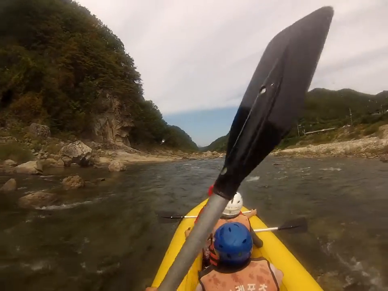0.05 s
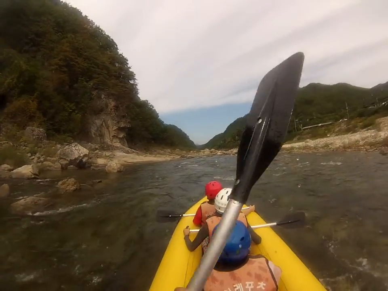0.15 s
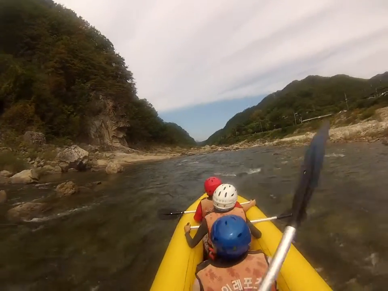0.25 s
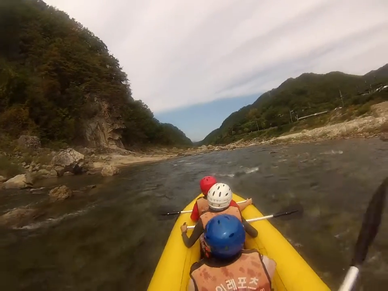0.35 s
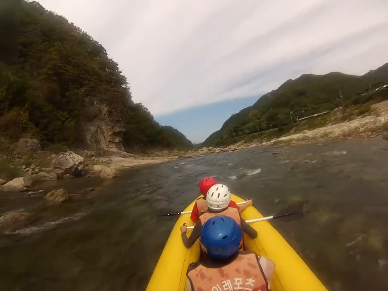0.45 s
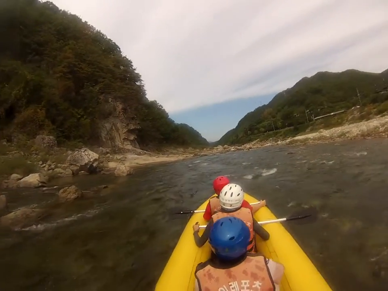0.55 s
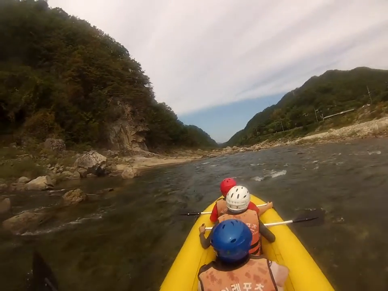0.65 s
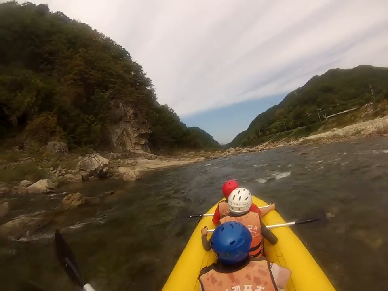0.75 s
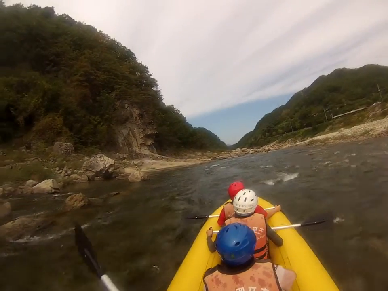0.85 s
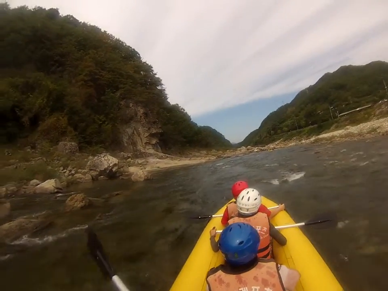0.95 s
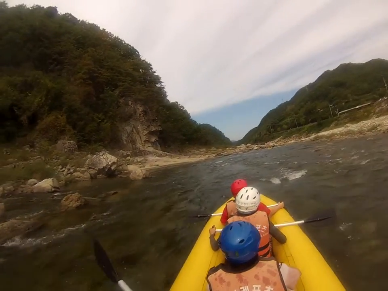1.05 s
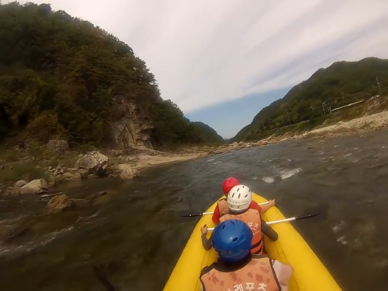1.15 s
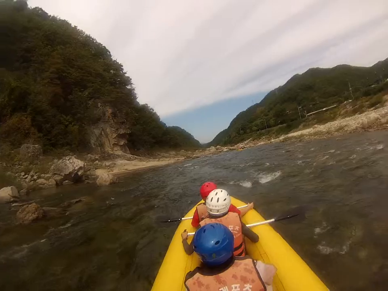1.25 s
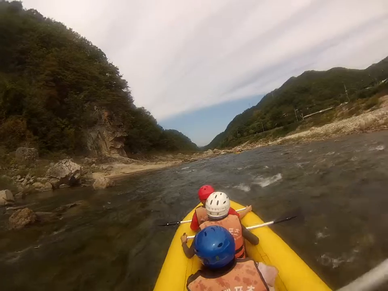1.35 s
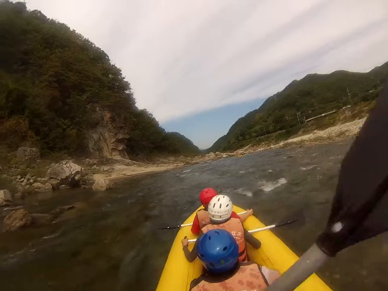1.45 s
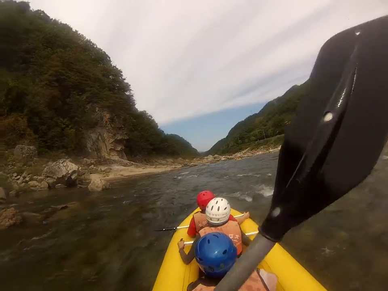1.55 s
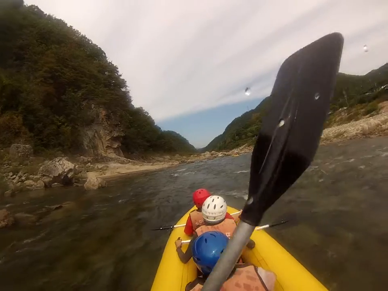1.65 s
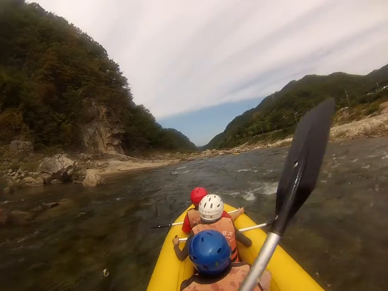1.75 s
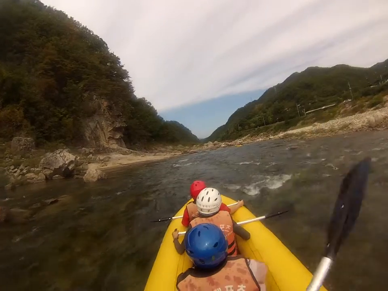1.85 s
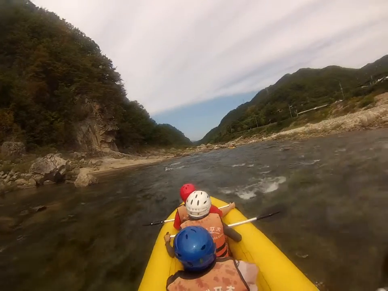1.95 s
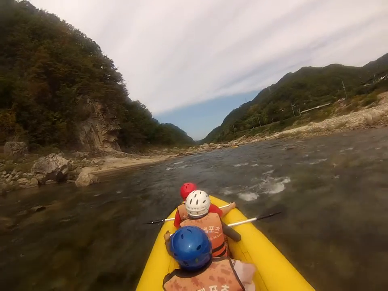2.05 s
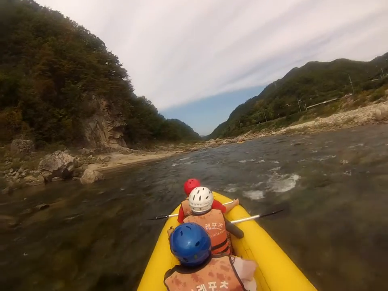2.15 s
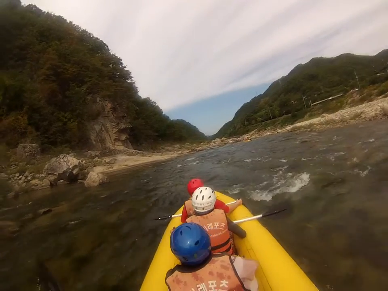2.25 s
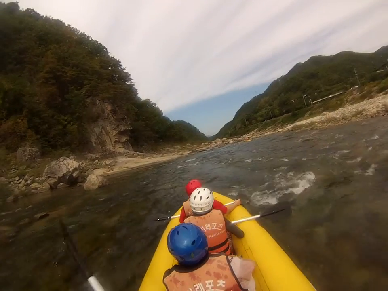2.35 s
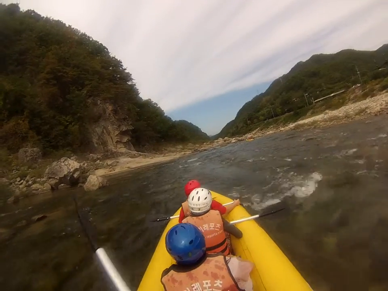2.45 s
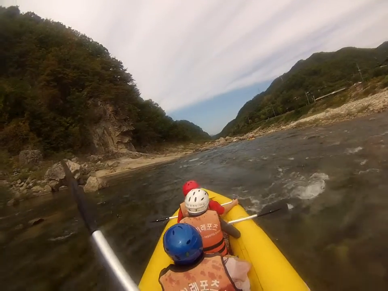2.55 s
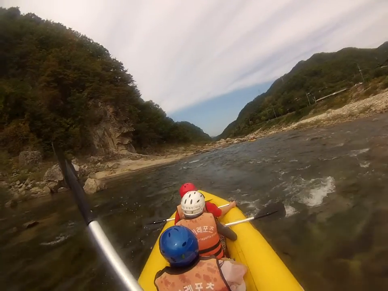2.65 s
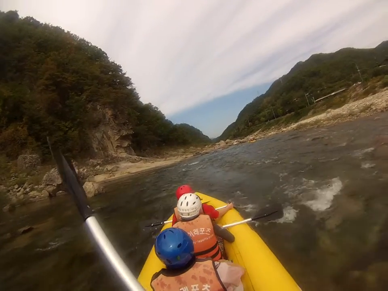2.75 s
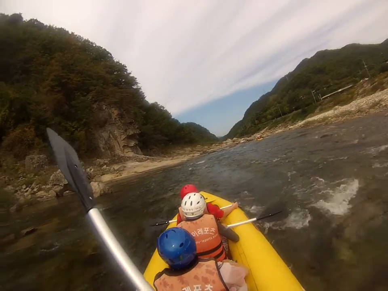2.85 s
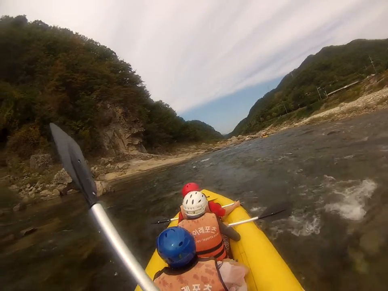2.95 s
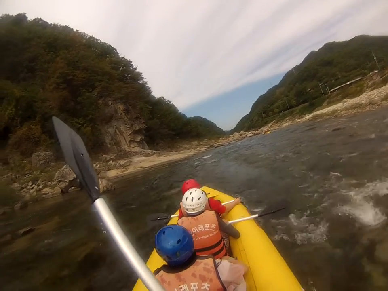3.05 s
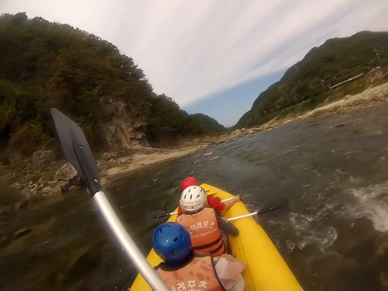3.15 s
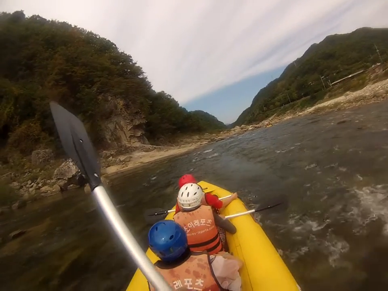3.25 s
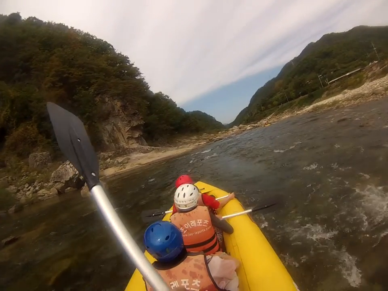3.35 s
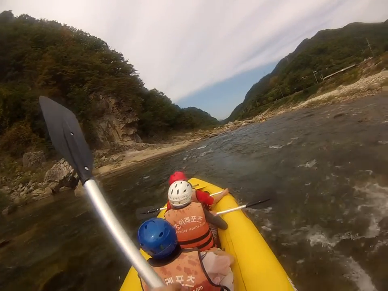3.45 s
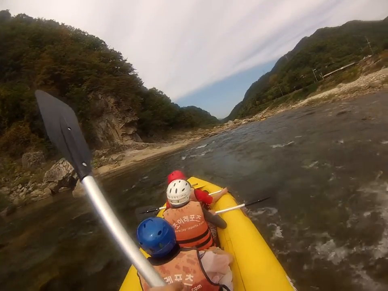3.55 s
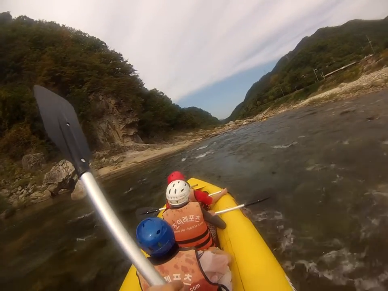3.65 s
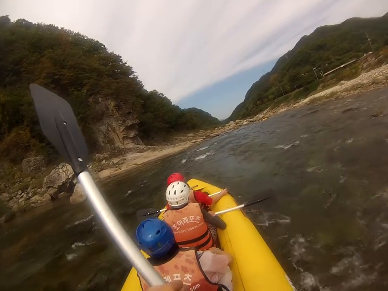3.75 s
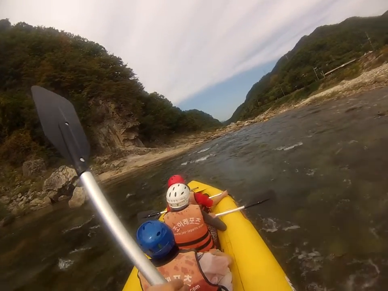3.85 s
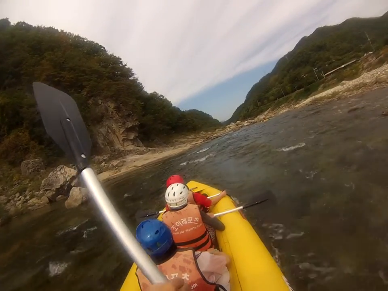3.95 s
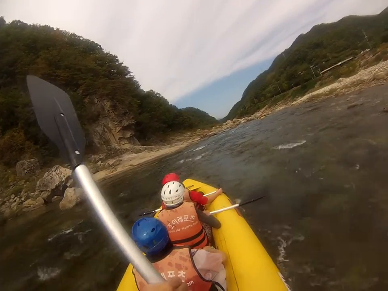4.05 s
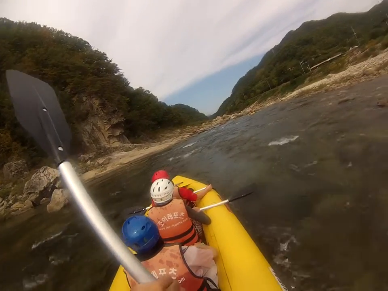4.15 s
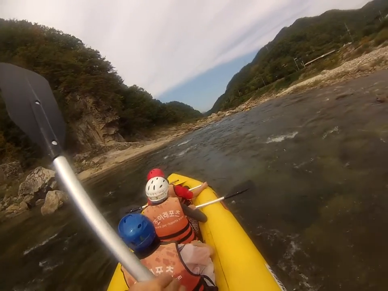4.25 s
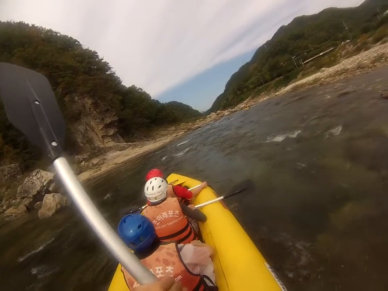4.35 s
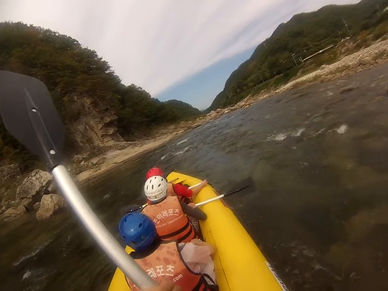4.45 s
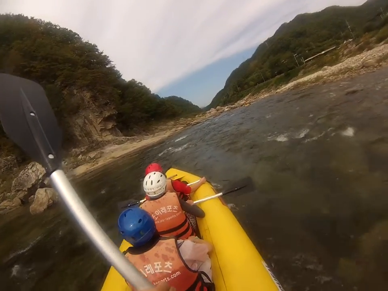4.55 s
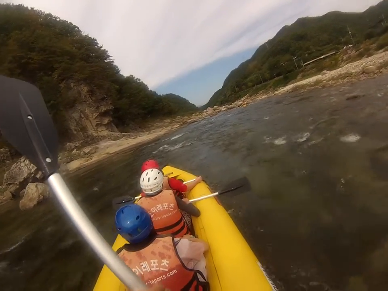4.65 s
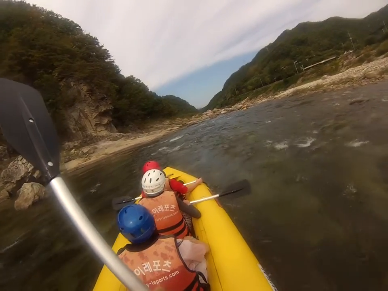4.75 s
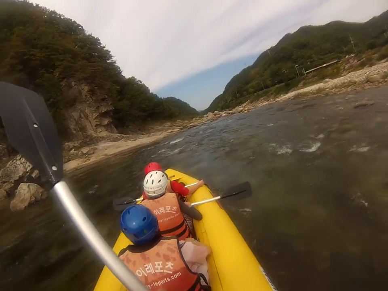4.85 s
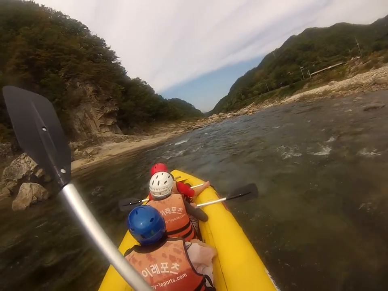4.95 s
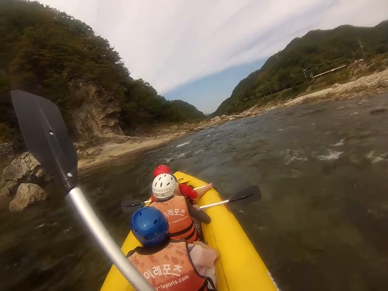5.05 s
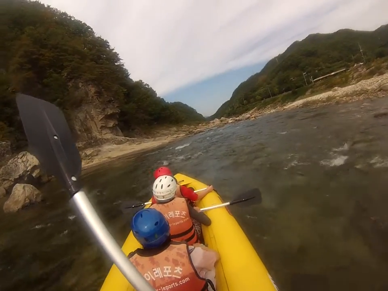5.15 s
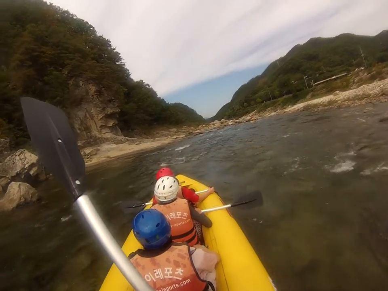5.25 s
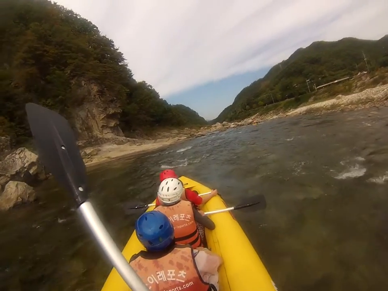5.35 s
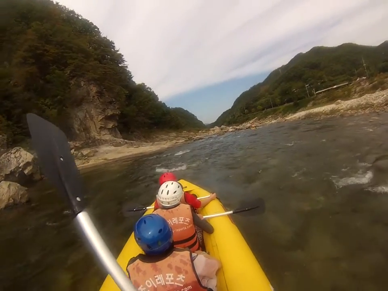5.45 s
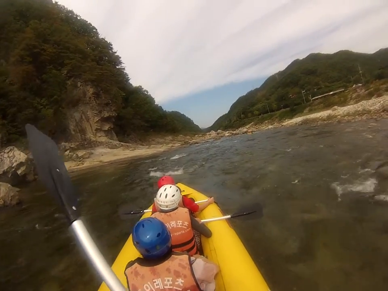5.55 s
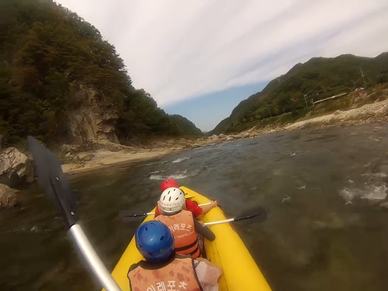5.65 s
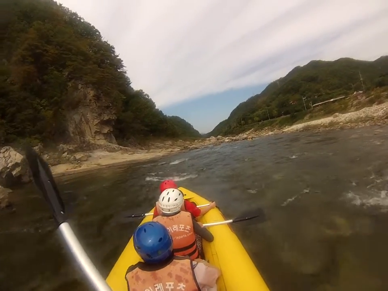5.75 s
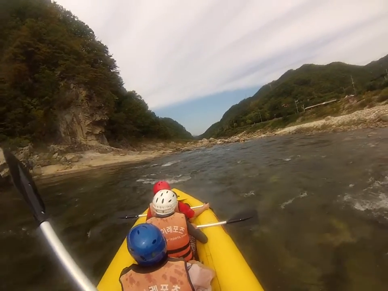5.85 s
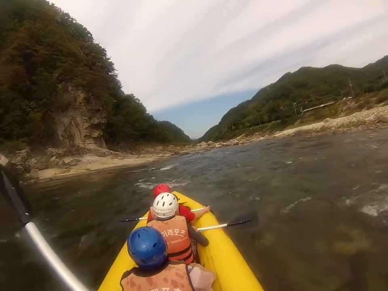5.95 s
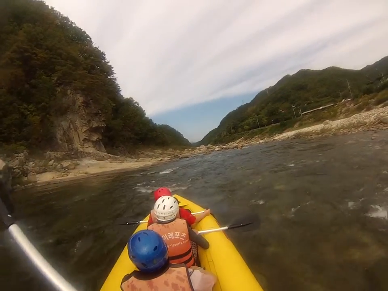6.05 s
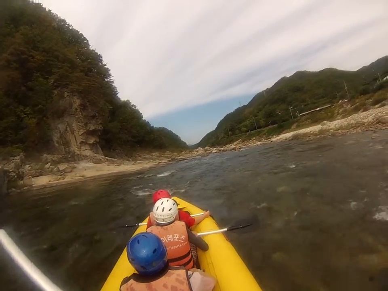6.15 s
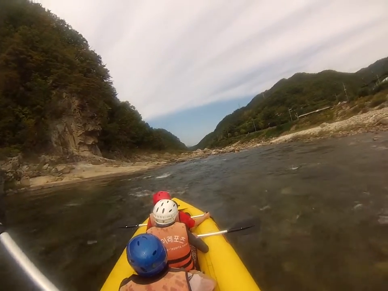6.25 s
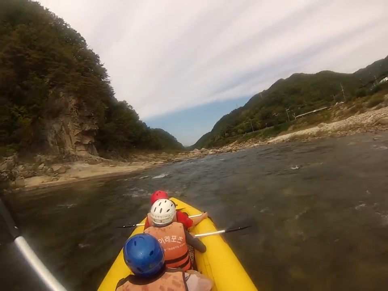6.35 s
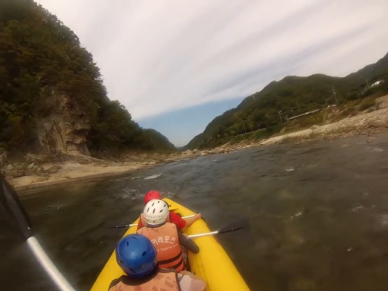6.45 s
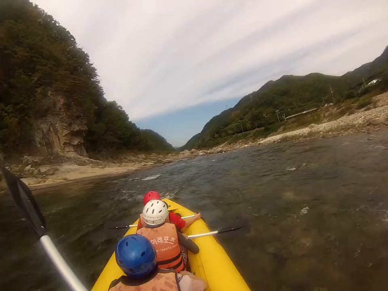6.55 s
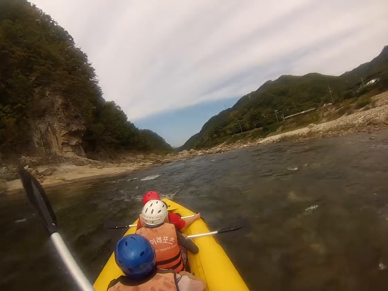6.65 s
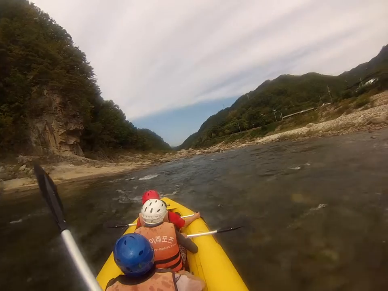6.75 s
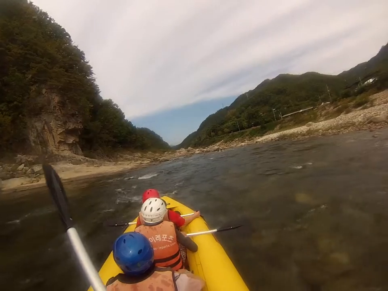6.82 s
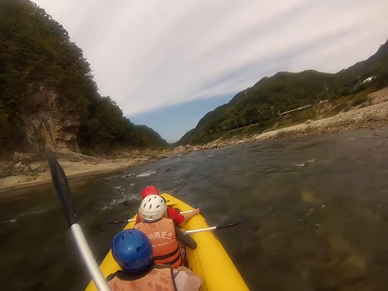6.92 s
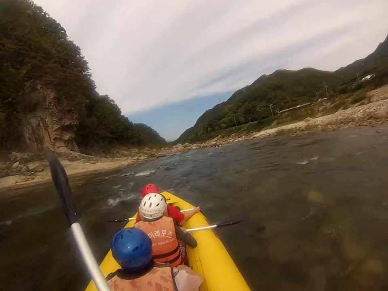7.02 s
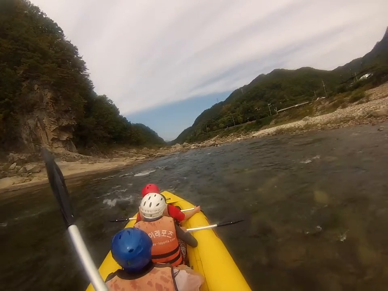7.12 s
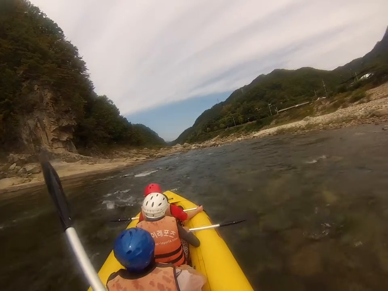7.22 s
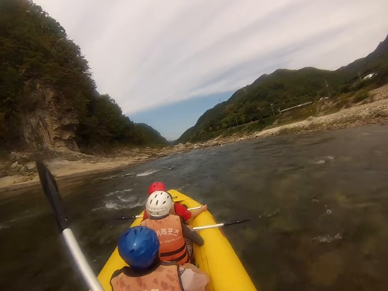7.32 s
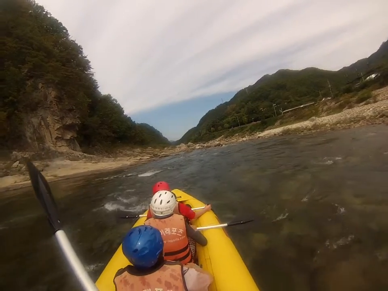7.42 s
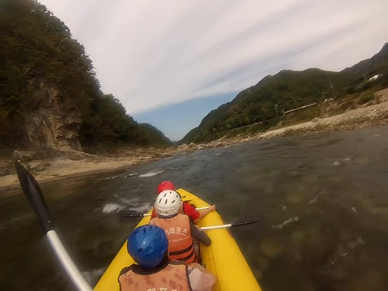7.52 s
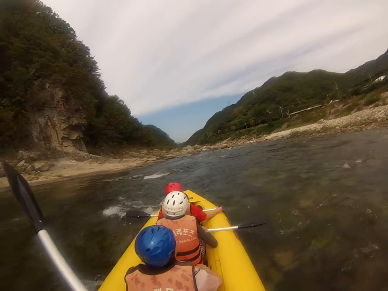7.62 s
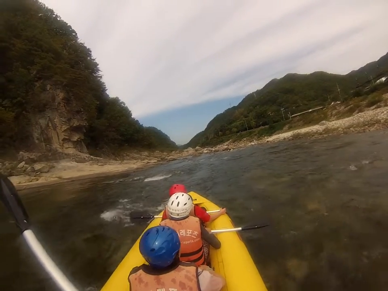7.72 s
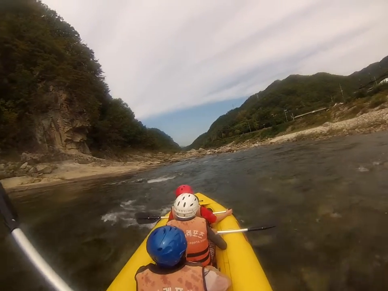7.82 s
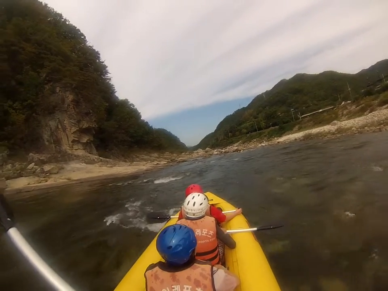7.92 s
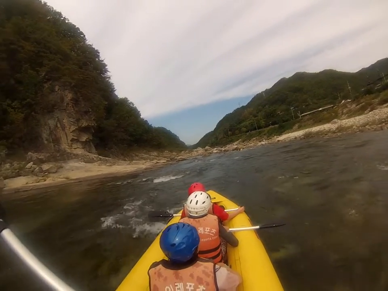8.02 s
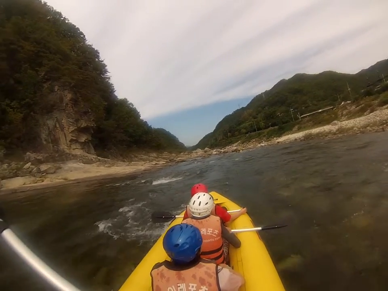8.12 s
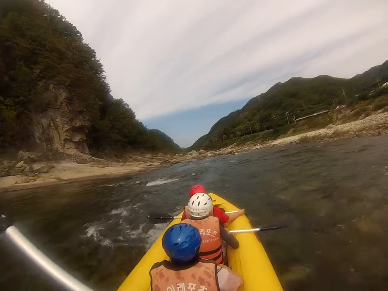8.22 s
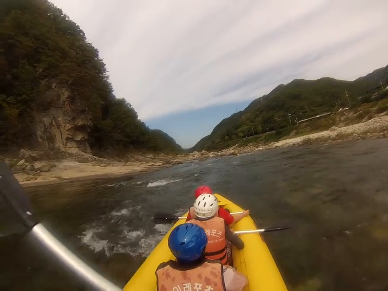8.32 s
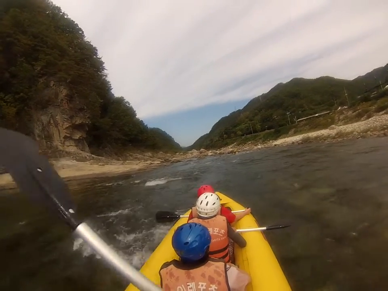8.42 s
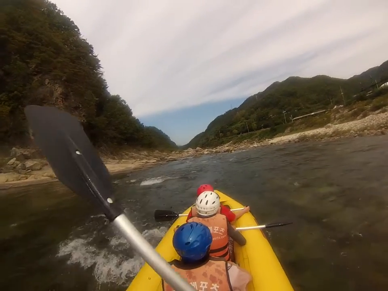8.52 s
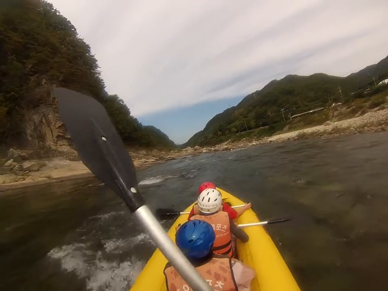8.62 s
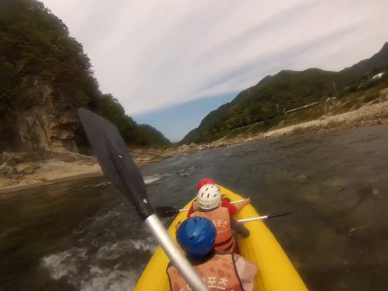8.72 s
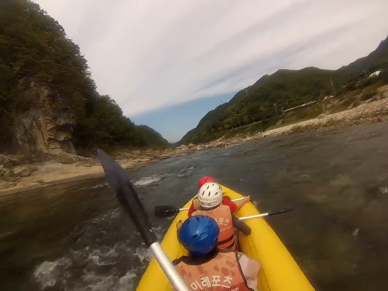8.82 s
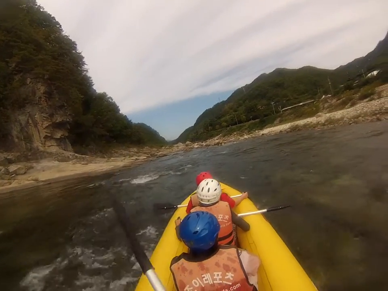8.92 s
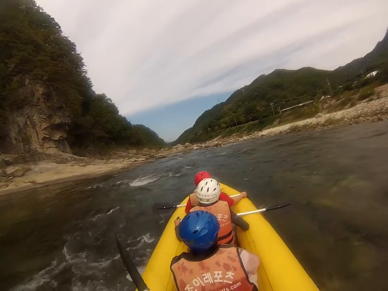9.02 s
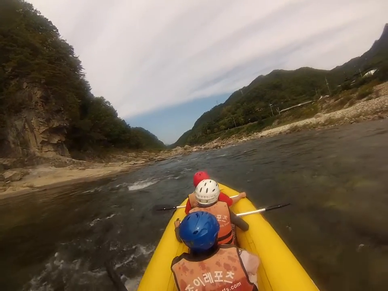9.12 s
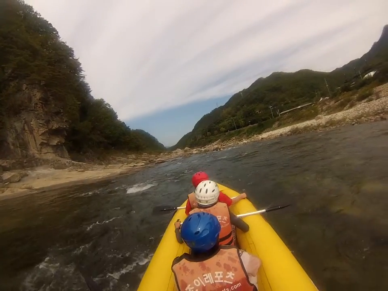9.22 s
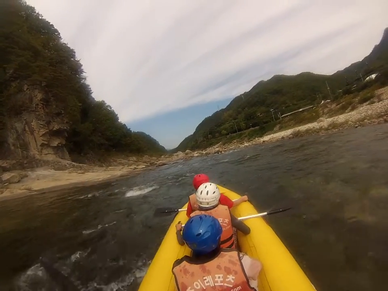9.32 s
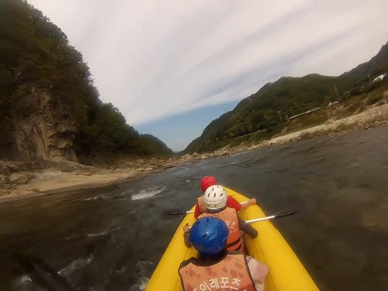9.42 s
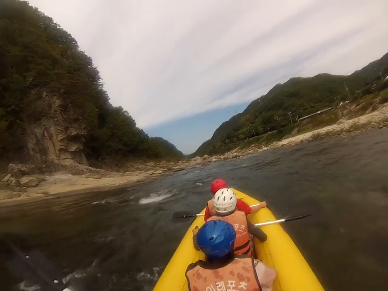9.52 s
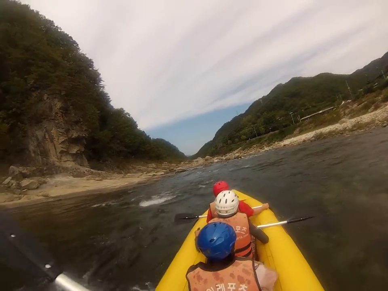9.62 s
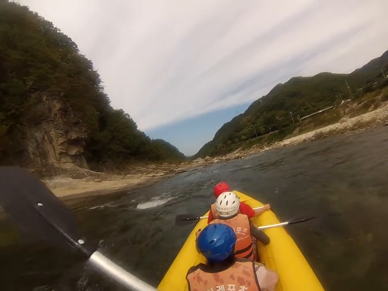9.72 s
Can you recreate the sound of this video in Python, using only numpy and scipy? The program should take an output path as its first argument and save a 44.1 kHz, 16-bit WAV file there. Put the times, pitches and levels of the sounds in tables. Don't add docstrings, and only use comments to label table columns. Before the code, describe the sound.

Shallow rapids rush and fizz around an inflatable boat, with bubbly plops, small splashes and a deep hull knock, heard through a sealed case.

```python
import sys
import numpy as np
from scipy import signal
from scipy.fft import rfft, irfft, next_fast_len
from scipy.io import wavfile
from scipy.ndimage import uniform_filter1d

SR = 44100
rng = np.random.default_rng(int(sys.argv[2]) if len(sys.argv) > 2 else 0)


def unload_audio(sound):
    columns = np.transpose(np.atleast_2d(sound))
    steps = np.round(np.clip(columns, -1, 1) * 32767)
    wavfile.write(sys.argv[1], SR, steps.astype(np.int16))


def boost_factor(decibels):
    exponent = np.asarray(decibels, float) / 20
    return 10 ** exponent


N = 431298
CONTROL_STEP = 40

# (frequency [Hz], level [dB per Hz])
WATER_TONE = [(100, -5.5), (300, -0.5), (700, -3.5), (1200, -2.5), (2000, -1.5), (3200, -11), (4500, -15.5),
              (7000, -20.5), (11000, -21.5), (16000, -33)]


def in_time(rows):
    s, *columns = np.transpose(rows)
    now = np.arange(0, N, CONTROL_STEP) / SR
    return [np.interp(now, s, column) for column in columns]


def gain_in_time(db):
    return np.interp(np.arange(N) / CONTROL_STEP, np.arange(len(db)), boost_factor(db))


def crest(s, length):
    age = (np.arange(0, N, CONTROL_STEP) / SR - s) / length
    return np.cos(np.pi * np.clip(age, -0.5, 0.5)) ** 2


def at_hz(points, hz):
    points = np.array(points)
    return np.interp(np.log(hz), np.log(points[:, 0]), points[:, 1])


def rms_one(x):
    return x / np.sqrt(np.mean(x ** 2) + 1e-20)


def drift(rate_hz):
    r = np.exp(-2 * np.pi * CONTROL_STEP * rate_hz / SR)
    noise = rng.standard_normal(N // CONTROL_STEP + 2001)
    return rms_one(signal.lfilter([1], [1, -2 * r, r * r], noise)[2000:])


def coloured(spectrum):
    hz = np.maximum(np.fft.rfftfreq(N, 1 / SR), 1)
    return rms_one(irfft(rfft(rng.standard_normal(N)) * boost_factor(at_hz(spectrum, hz)), N))


def microphone_hiss():
    # (frequency [Hz], level [dB per Hz])
    hiss_tone = [(100, 7), (400, -2), (1000, -3.5), (3000, -10.5), (8000, -12), (12000, -19.5),
                 (16000, -20.5)]
    return boost_factor(-65) * coloured(hiss_tone)


def thumps():
    # (time [s], peak level [dB], start pitch [Hz], end pitch [Hz], length [s])
    knocks = [
        (0.456, -41.5, 204, 124, 0.076),
        (1.862, -30.5, 123, 52, 0.041),
        (1.86, -46.5, 246, 250, 0.026),
    ]
    swell = 0.31
    out = np.zeros(N)
    for s, db, start_hz, end_hz, length in knocks:
        age = np.arange(int(length * SR)) / SR / length
        pitch_hz = start_hz * (end_hz / start_hz) ** age
        phase = 2 * np.pi * np.cumsum(pitch_hz) / SR
        rise = np.sin(np.pi / 2 * np.minimum(age / swell, 1)) ** 2
        fall = np.clip((1 - age) / (1 - swell), 0, 1) ** 0.46
        start = int(s * SR)
        out[start:start + age.size] += boost_factor(db) * np.minimum(rise, fall) * np.sin(phase)
    return out


def buffet():
    # (frequency [Hz], level [dB per Hz])
    heave_tone = [(4, 2), (8, 9.5), (18, 9), (25, -4), (35, -7.5), (55, -24), (120, -48), (1000, -130)]
    # (frequency [Hz], level [dB per Hz])
    flutter_tone = [(18, -15), (30, 3.5), (70, 3.5), (100, -6.5), (140, -12.5), (220, -19), (400, -49),
                    (3000, -110)]
    # (time [s], level [dB])
    wind_push = [(0.0, -45), (.12, -34), (.6, -30.5), (.65, -47), (1.5, -43), (1.59, -32.5), (2.0, -34),
                 (2.7, -41), (3.2, -45.5), (4.1, -45), (4.9, -41.5), (5.3, -51), (6.5, -51.5), (7.6, -49.5),
                 (8.2, -45.5), (8.9, -36.5), (9.3, -46.5), (9.78, -52.5)]
    # (time of crest [s], heave lift [dB], flutter lift [dB], length [s])
    lurches = [(0.11, 3, 6.5, 0.36), (0.503, -1, 2, .2), (1.22, 10, 2, 0.25), (1.623, 7, -1, 0.13),
               (1.913, 6, -5, 0.15), (2.172, 4.5, 0, .1), (2.578, 8, -4, 0.11), (3.052, 8, 1, 0.15),
               (3.5, 6.5, 3.5, 0.82), (4.21, 6.5, -4, 0.1), (4.405, -4, 5, 0.18), (4.827, 6.5, -1.5, 0.18),
               (5.45, 8.5, -1.5, 0.46), (5.862, 8, -2, 0.38), (6.17, 13, -6, 0.26), (6.435, 16, -7, 0.13),
               (6.665, 11.5, -7, 0.26), (6.92, 9.5, -0.5, 0.28), (7.138, 6, -7, 0.22), (7.34, -7, 0, 0.18),
               (7.58, -13, -5, 0.17), (7.75, 3, 1, .3), (7.98, -20, 6, 0.11), (8.232, 6.5, -2, 0.22),
               (8.706, 4.5, 0, 0.18), (8.783, -11, 10, 0.067), (8.855, 10, 5, 0.13), (8.999, 13, 3, 0.13),
               (9.198, 13, 6, 0.08), (9.468, 8, 0, 0.35)]

    push_db, = in_time(wind_push)
    heave_db, flutter_lift_db = sum(np.outer([heave_lift, flutter_lift], crest(s, length))
                                    for s, heave_lift, flutter_lift, length in lurches)
    heave_db = push_db + heave_db
    flutter_db = -56 + 0.25 * (heave_db + 43) + flutter_lift_db
    heave = coloured(heave_tone)
    swell = uniform_filter1d(np.abs(signal.hilbert(heave, next_fast_len(N))[:N]), size=4000)
    heave = rms_one(heave / (swell + 0.47))
    flutter = gain_in_time(flutter_db + 0.73 * drift(7.9)) * coloured(flutter_tone)
    return gain_in_time(heave_db) * heave + flutter


def washes():
    # (time of crest [s], level [dB], pitch [Hz], length [s])
    passing = [
        (7.2, -71.5, 2720, 2.2),
        (8.58, -68, 2590, 2.8),
        (3.6, -69, 3350, 2.0),
        (3.7, -78, 5720, 2.8),
        (4.2, -78, 8600, 1.8),
        (9.48, -77, 7750, .6),
        (2.3, -76, 6600, 0.73),
        (8.6, -78, 5330, 0.96),
        (3.8, -78, 10400, 3),
    ]
    half_width = 0.07 / 2
    out = 0
    for s, db, hz, length in passing:
        edges_hz = [hz / (1 + half_width), hz * (1 + half_width)]
        sos = signal.butter(2, edges_hz, "band", fs=SR, output="sos")
        level_db = db + 10 * np.log10(crest(s, length) + 1e-6) + 2.0 * drift(18.0)
        out = out + gain_in_time(level_db) * rms_one(signal.sosfilt(sos, rng.standard_normal(N)))
    return out


def bubbles(s, db, hz, t60, rise, swell):
    t = np.arange(int(max(t60) * SR))[None] / SR
    s, db, hz, t60, rise = (np.reshape(v, (-1, 1)) for v in (s, db, hz, t60, rise))
    age = t / t60
    envelope = boost_factor(db - 60 * age) * np.minimum(age / swell, 1) ** 2
    rings = envelope * np.sin(2 * np.pi * hz * t * (1 + rise * (age - 0.25)))
    start_s = np.maximum(s - 0.599 * swell * t60, 0)
    at = (start_s * SR).astype(int) + np.arange(t.size)
    return np.bincount(at.ravel(), rings.ravel(), N + t.size)[:N]


def near_bubbles(events, cycles, rise):
    s, db, hz = np.transpose(events)
    return bubbles(s, db, hz, cycles / hz, np.full_like(s, rise), swell=0.24)


def near_drops():
    # (time [s], peak level [dB], pitch [Hz])
    plops = [(2.7152, -29.5, 2200), (2.9711, -40, 2250), (2.9941, -38, 2180), (3.0335, -38, 2180),
             (3.0779, -35, 2230), (3.3777, -36, 2270), (3.4057, -36, 2180), (3.5838, -44, 2120),
             (4.2138, -41, 2220), (4.3445, -34, 2260), (4.5605, -47, 2300), (5.15, -38, 2290),
             (5.589, -36, 2200), (7.1117, -44, 2260), (8.765, -38.5, 2260), (8.9496, -54, 2260)]
    # (time [s], peak level [dB], pitch [Hz])
    gulps = [(0.3296, -44, 1420), (0.405, -44, 1230), (0.5207, -38, 1320), (0.9964, -40.5, 1170),
             (3.3363, -44.5, 1170), (3.6576, -38, 1550), (3.74, -36, 1073), (3.9529, -43, 1140),
             (4.6912, -56, 1150), (5.1427, -44, 1160), (5.4592, -37, 1660), (5.948, -46, 1120),
             (9.1381, -55, 1410), (9.3003, -39, 1530)]
    # (time [s], peak level [dB], pitch [Hz])
    gurgles = [(0.415, -54, 221), (3.377, -51, 373), (3.862, -53, 317), (4.291, -50, 318),
               (4.477, -50, 620), (5.068, -51, 406), (5.6, -58, 530), (7.744, -55, 350), (8.369, -50, 371),
               (8.703, -50, 324), (8.974, -58, 240), (9.139, -45, 362), (9.253, -49, 290)]
    # (time [s], peak level [dB], pitch [Hz])
    tiny_drops = [(1.1358, -40, 5200), (1.8327, -51, 5010), (2.0722, -43, 5540), (2.9317, -49, 5730),
                  (2.9996, -56, 5680), (4.0637, -53, 5690), (4.2991, -46, 4430), (4.5675, -47, 5070),
                  (4.583, -40, 10000), (4.6693, -54, 7700), (4.7057, -53, 4470), (4.7227, -42, 7530),
                  (4.802, -44, 5730), (4.8239, -54, 4820), (5.1407, -52, 5810), (5.1417, -47, 7810),
                  (5.1891, -58, 7740), (5.9105, -51, 7390), (8.2811, -55, 7100), (8.2935, -47, 6930),
                  (8.4362, -51, 5210), (8.8079, -47, 7020), (9.0074, -50, 4550), (9.3601, -51, 7600),
                  (9.3881, -48, 5950), (9.6959, -50, 4600), (9.7084, -48, 5980)]
    low = near_bubbles(gulps, 56, rise=0.07) + near_bubbles(gurgles, 26.5, rise=0.08)
    return near_bubbles(plops, 72, rise=0.1) + low + near_bubbles(tiny_drops, 30, rise=0.14)


def passing_water():
    # (time [s], level [dB])
    nearness = [(0.0, -5), (.3, -2), (.6, -0.5), (1.2, -3), (1.8, -1.5), (2.2, -0.5), (2.7, 0.5), (3.1, 6),
                (3.6, 5.5), (4.3, 6), (4.7, 3.5), (5.2, 2.5), (5.9, -2), (6.7, -5), (7.4, -3.5), (8.1, -6),
                (8.8, -1.5), (9.78, -2.5)]
    # (frequency [Hz], share [0..1])
    follows = [(400, 0.25), (900, 0.34), (1400, 0.45), (1800, 0.64), (2250, 0.92), (2800, 0.76),
               (4000, 0.68), (10000, 0.47)]
    # (time of crest [s], lift [dB], centre [Hz], length [s])
    splashes = [(0.01, 12, 300, .06), (.48, 11, 320, 0.2), (0.535, 3.5, 2400, .12), (.75, 2.5, 6000, .25),
                (1.88, 3, 500, 0.33), (2.25, 3, 5550, 0.51), (2.74, 5, 3500, 0.099), (2.984, 5, 500, .08),
                (2.963, 3, 4000, 0.19), (3.336, 3, 2600, 0.13), (3.852, 3, 1320, 0.67),
                (2.1, 2.5, 1490, .35), (4.25, 2, 2480, .1), (4.305, 5, 400, .06), (4.306, 3, 6000, .06),
                (4.58, 4.5, 2970, 0.065), (5.074, 5, 500, .07), (5.144, 9, 2400, 0.035),
                (5.597, 1, 2300, .1), (5.874, 2.5, 2300, 0.19), (7.343, 3, 2800, .12), (8.436, 5, 3200, .3),
                (8.752, 1.5, 2300, .2), (9.204, 1.5, 2200, 0.14), (9.4, 6, 8400, 0.23), (8.9, 5, 540, 0.37),
                (9.036, 4, 3500, 0.088), (9.22, 3.5, 495, 0.25), (9.334, 2.5, 1300, 0.43),
                (9.39, 5.5, 3330, 0.34)]

    lifts = [db * crest(s, length) for s, db, _, length in splashes]
    levels_db = np.array(in_time(nearness) + lifts)

    def shares(hz):
        near_centre = [np.exp(-np.log2(hz / centre) ** 2) for _, _, centre, _ in splashes]
        return np.array([at_hz(follows, hz)] + near_centre)

    return levels_db, shares


def rush(levels_db, shares, surge):
    edges = 100 * 2 ** np.arange(0, 7.7, 1 / 3)
    white, out = rng.standard_normal((2, N)), 0
    for k, (low, high) in enumerate(zip(edges, edges[1:])):
        hz = np.sqrt(low * high)
        near = np.clip(np.log2(hz / 700) / 3.43, 0, 1)
        patches_db = 2.48 * near * (0.35 * surge + 0.57 * drift(24.0))
        sos = signal.butter(2, [low, high], "band", fs=SR, output="sos")
        band = signal.sosfilt(sos, white[k % 2])
        out = out + band * gain_in_time(at_hz(WATER_TONE, hz) + shares(hz) @ levels_db + patches_db)
    return out / 2


def fizz(levels_db, shares, surge, per_s=400):
    draw = rng.random((4000, 4))[:int(per_s * N / SR)]
    s = draw[:, 0] * N / SR
    hz = 800 * 16.85 ** draw[:, 1]
    at = (s * SR).astype(int) // CONTROL_STEP
    size_db = -5.5 * np.log(draw[:, 2] + 0.052) + 1.0 * surge[at]
    tone_db = at_hz(WATER_TONE, hz) + 6.1 * np.log2(hz / 2000)
    passing_db = (shares(hz) * levels_db[:, at]).sum(axis=0)
    t60 = (12.6 + 26.0 * draw[:, 3]) / hz
    return bubbles(s, size_db + tone_db + passing_db - 20, hz, t60, np.full_like(s, 0.3), swell=0.024)


def rapids():
    levels_db, shares = passing_water()
    surge = 0.5 * drift(7.7) + 1.38 * drift(52.0)
    return rush(levels_db, shares, surge) + fizz(levels_db, shares, surge)


def through_case(x):
    # (frequency [Hz], width [Hz], gain [dB])
    resonances = [(950, 48, -2.5), (1160, 274, 10), (1560, 360, 7), (1888, 132, -8.5), (2260, 420, 9.5),
                  (2800, 110, 4.5), (3570, 910, 5), (3920, 210, -8), (4070, 150, 1.5), (5690, 270, 4),
                  (6700, 440, 4.5), (7580, 600, 4.5), (10300, 450, -1.5)]
    for hz, width_hz, db in resonances:
        w, a = 2 * np.pi * hz / SR, boost_factor(db / 2)
        q = np.sin(w) * width_hz / hz / 2
        turn = -2 * np.cos(w)
        x = signal.lfilter([1 + q * a, turn, 1 - q * a], [1 + q / a, turn, 1 - q / a], x)
    return x


def scene():
    water = boost_factor(-41.5) * through_case(rapids()) + boost_factor(7) * near_drops()
    return (water + buffet() + thumps() + washes())[None]


def low_pass(x):
    return signal.sosfilt(signal.butter(12, 15290, fs=SR, output="sos"), x)


def record(dry):
    return low_pass(dry + microphone_hiss())


dry = scene()
out = record(dry)
unload_audio(out)
```